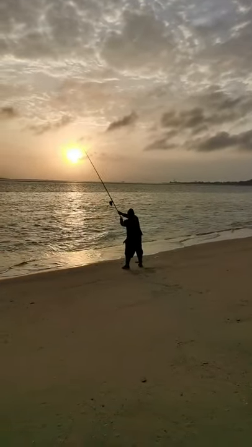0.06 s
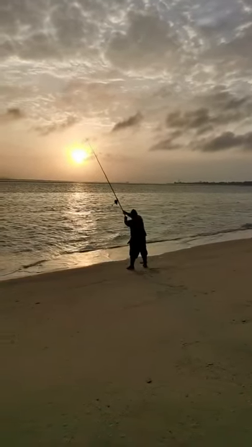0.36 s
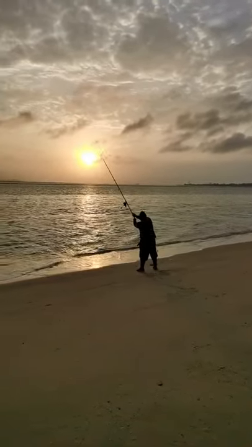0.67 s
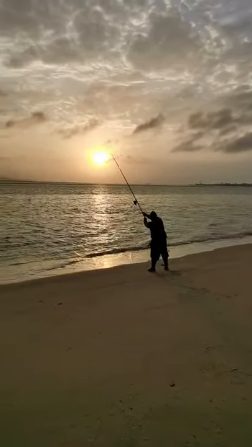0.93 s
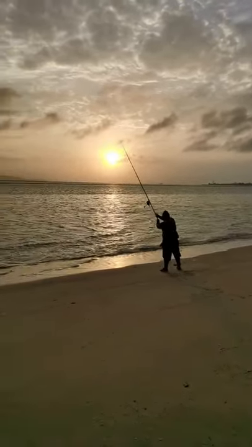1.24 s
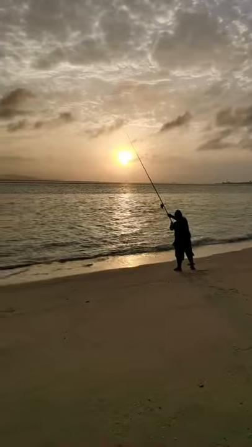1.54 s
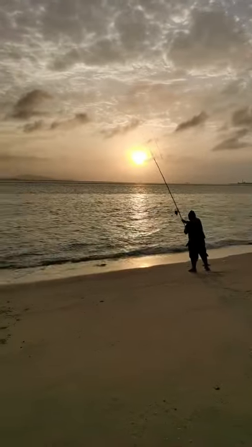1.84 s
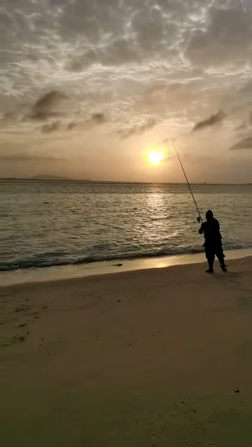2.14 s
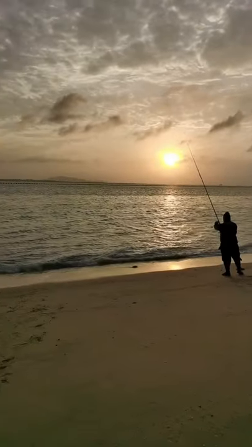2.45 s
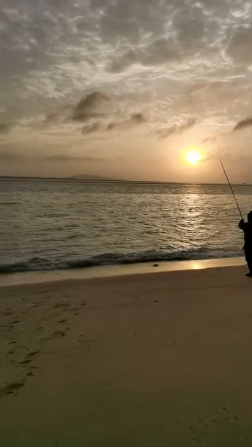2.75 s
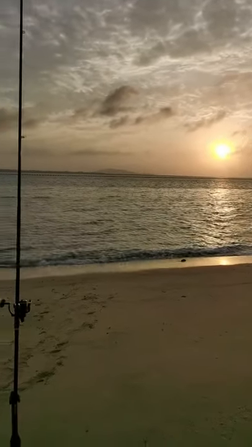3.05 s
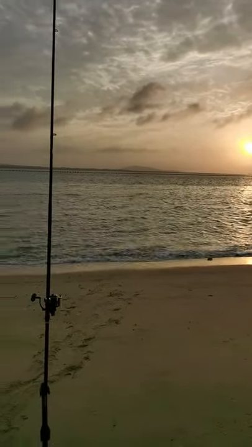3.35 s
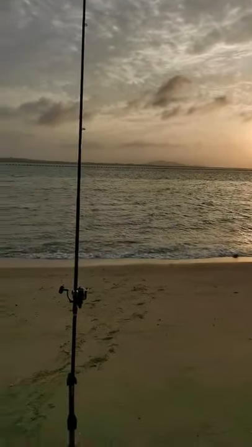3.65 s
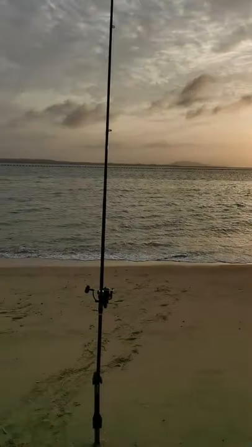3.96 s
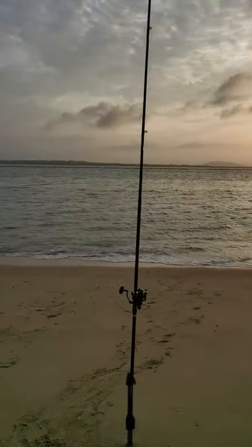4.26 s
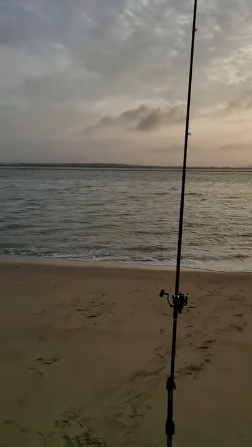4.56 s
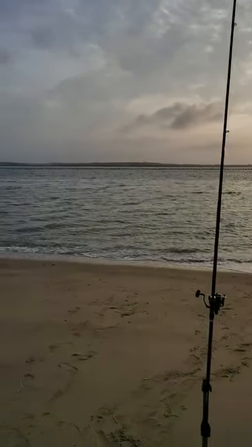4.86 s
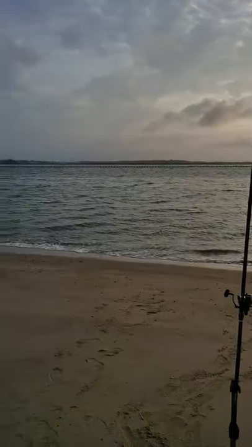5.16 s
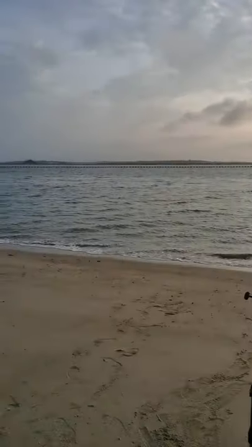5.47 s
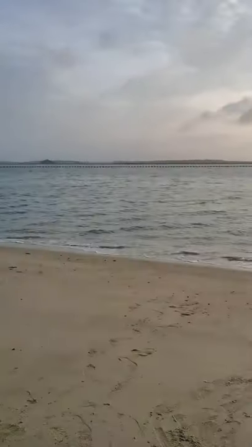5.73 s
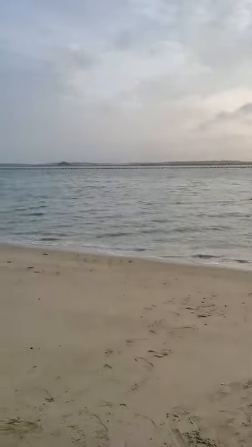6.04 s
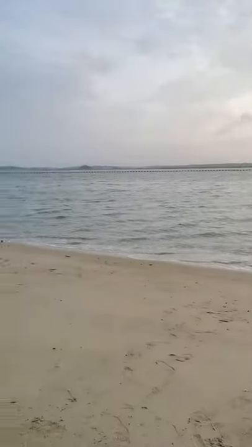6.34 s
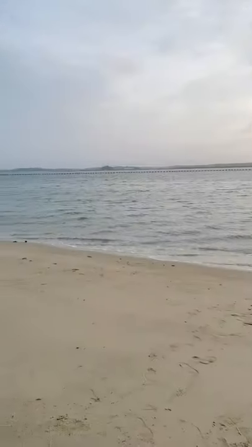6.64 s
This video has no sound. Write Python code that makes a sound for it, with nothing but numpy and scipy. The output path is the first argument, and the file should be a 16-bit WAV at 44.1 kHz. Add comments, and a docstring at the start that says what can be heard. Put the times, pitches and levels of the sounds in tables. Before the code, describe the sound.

Wind on an open beach buffets a small microphone with an uneven low rumble and fine crackle. Early on, two loud blasts tear across it, full of pops and thumps. The wind then eases to a softer rumble with scattered puffs and pops. Behind it, small waves lap and bubble quietly, and their foam fizzes into the sand.

```python
"""An uneven low rumble: wind on an open beach buffets a small microphone.
Two blasts tear across its port in strings of roaring surges, while single eddies thump, pop and crackle.
Behind the wind, small waves lap and bubble, and their foam fizzes into the sand.
Loud wind ducks the treble and a limiter holds the peaks."""
import sys
import numpy as np
from scipy import signal
from scipy.fft import rfft, irfft, next_fast_len
from scipy.io import wavfile
from scipy.ndimage import uniform_filter1d, minimum_filter1d, map_coordinates

SR = 44100
rng = np.random.default_rng(int(sys.argv[2]) if len(sys.argv) > 2 else 0)


def master_out(mix):
    """Clip the mix to full scale and print it as 16-bit PCM to the path in sys.argv[1]."""
    frames = np.transpose(np.atleast_2d(mix))
    ceiling = np.clip(frames, -1, 1)
    pcm = np.round(ceiling * 32767).astype(np.int16)
    wavfile.write(sys.argv[1], SR, pcm)


N = 295470


def amp(db):
    """Decibels to gain."""
    return 10 ** (np.asarray(db) / 20)


def unit(x):
    """Scale to rms 1."""
    return x / np.sqrt(np.mean(x ** 2) + 1e-20)


def clock():
    """The time of each sample, in seconds."""
    return np.arange(N) / SR


def automation(rows):
    """One breakpoint curve for each column after the time."""
    times, *columns = np.transpose(rows)
    return [np.interp(clock(), times, column) for column in columns]


def gate(start_s, end_s, fade_s):
    """Open between two times, with a linear fade centred on each."""
    return np.clip(np.minimum(clock() - start_s, end_s - clock()) / fade_s + .5, 0, 1)


def wobble(rate_hz):
    """A smooth random modulator without extreme swings."""
    knots = np.clip(rng.standard_normal(N // 20), -2, 2)
    t = clock()
    coarse = map_coordinates(knots, [t[::20] * rate_hz], mode="mirror")
    return np.interp(t, t[::20], coarse)


def impulse_response(eq, size=8192):
    """The minimum-phase response of an EQ curve of (freq_hz, gain_db) points."""
    hz, db = np.transpose(eq)
    gain_db = np.interp(np.log(np.fft.rfftfreq(size, 1 / SR) + 1), np.log(hz), db)
    cepstrum = irfft(np.log(amp(gain_db)))
    cepstrum[1:size // 2] *= 2
    cepstrum[size // 2 + 1:] = 0
    return irfft(np.exp(rfft(cepstrum))) * np.hanning(2 * size)[size:]


def colour(x, eq):
    """Run x through an EQ curve and scale it to rms 1."""
    return unit(signal.fftconvolve(x, impulse_response(eq))[:N])


def rush(eq, swell_db):
    """Coloured noise of rms 1 whose drive swells and sinks."""
    return colour(rng.standard_normal(N) * amp(swell_db), eq)


def steady(x, window_s):
    """Even out the slow swells of a noise and keep its fast grain."""
    power = np.abs(uniform_filter1d(x ** 2, int(window_s * SR)))
    return x / np.sqrt(power + 1e-4)


def patchy(x, depth_db):
    """Patches of random gain, a few hundred Hz wide, come and go in a noise."""
    spectrogram = signal.stft(x, nperseg=512)[2]
    patches = uniform_filter1d(rng.standard_normal(spectrogram.shape), size=4, axis=0)
    patches = unit(uniform_filter1d(patches, size=40, axis=1))
    return unit(signal.istft(spectrogram * amp(depth_db * patches), nperseg=512)[1][:N])


def snaps(per_s):
    """Sudden pressure jumps of random size and timing."""
    return unit(rng.standard_normal(N) * (rng.random(N) < per_s / SR))


def bursts(rows, width, fade_s, grain_db):
    """One burst of grainy band noise a row; width is a share of the centre frequency."""
    out = np.zeros(N)
    drive = rng.standard_normal(N) * amp(grain_db * wobble(300))
    for start, length, hz, db in rows:
        band = signal.butter(2, [hz / (1 + width), hz * (1 + width)], "band", fs=SR, output="sos")
        noise = steady(unit(signal.sosfilt(band, drive)), window_s=0.28)
        out += amp(db) * gate(start, start + length, fade_s) * noise
    return out


def pings(start_s, pitch_hz, level_db, rise_cycles):
    """Short sine rings that peak after rise_cycles of their pitch, then die."""
    offsets = np.arange(3000)
    cycles = pitch_hz[:, None] * offsets / SR
    age = cycles / rise_cycles
    rings = amp(level_db)[:, None] * age * np.exp(1 - age) * np.sin(2 * np.pi * cycles)
    positions = np.round(start_s * SR).astype(int)[:, None] + offsets
    return np.bincount(positions.ravel(), rings.ravel(), N)[:N]


# airy top of the spent foam: freq_hz, gain_db
FIZZ_EQ = [(7000, -30), (9500, -2), (12000, -4), (14700, -1), (15500, -22.5)]
# foam draining after the largest wave: time_s, level_db
FIZZ_LEVELS = [(3.2, -88.5), (3.7, -74), (4.3, -70), (4.9, -74), (5.6, -72.5), (6.3, -77.5)]
def fizz(grain_db=2):
    """Spent foam fizzes brightly as it sinks into the sand."""
    level_db, = automation(FIZZ_LEVELS)
    return amp(level_db) * rush(FIZZ_EQ, grain_db * wobble(500))


# midrange wash of the water: freq_hz, gain_db
WASH_EQ = [(150, -26.5), (500, 10), (850, 3), (1200, 5), (1500, 1.5), (2400, 3.5), (3000, 1), (3450, -3),
           (4300, -0.5), (4700, -10.5), (5200, -64), (9000, -44)]
# bright hiss of fresh foam: freq_hz, gain_db
FOAM_EQ = [(2000, -16.5), (4500, 0.5), (6000, 3), (8000, 1), (10500, 3.5), (12500, 2.5), (14500, -4.5),
           (15700, -12.5)]
# rise and fall of the small waves: time_s, wash_db, foam_db
SEA_LEVELS = [(0, -52.5, -63), (.6, -63, -69.5), (1, -62, -63), (1.599, -65.5, -70.5), (2, -58, -60.5),
              (2.7, -56.5, -66), (3.1, -48.5, -57), (3.7, -53, -67.5), (4.35, -53, -66.5),
              (4.8, -52.5, -71.5), (5.5, -58, -72), (6.35, -60, -75), (6.7, -57, -69.5)]
# single wavelets spilling over: start_s, length_s, centre_hz, level_db
SPILLS = [(.05, 0.51, 975, -63.5), (3.17, 0.074, 3400, -52.5), (3.85, 0.75, 2300, -63.5),
          (5.18, 0.37, 1730, -62.5), (5.3, 1.25, 515, -57.5), (5.6, 1.3, 727, -61.5),
          (5.8, 0.12, 1680, -58), (6.53, 0.15, 2100, -61), (6.52, 0.29, 3770, -67)]
def waves(wash_trim_db=-1, lap_db=1.0, splash_db=1.7):
    """Wavelets lap and spill at shifting pitches; their foam hisses on the sand."""
    wash_db, foam_db = automation(SEA_LEVELS)
    water = rush(WASH_EQ, lap_db * wobble(12) + splash_db * wobble(200))
    water = steady(patchy(water, depth_db=1.7), window_s=.3)
    spills = bursts(SPILLS, width=0.18, fade_s=0.068, grain_db=4.0)
    foam = rush(FOAM_EQ, 1.5 * wobble(660))
    return amp(wash_db + wash_trim_db) * water + spills + amp(foam_db) * foam


def bubbles(trim_db=-14, low_hz=780, high_hz=3900, spread_db=3.5, count=1100):
    """A crowd of tiny bubbles rings in the lapping water and follows its loudness."""
    when, pitch, size = rng.random((count, 3)).T
    start_s = when * N / SR
    pitch_hz = low_hz * (high_hz / low_hz) ** pitch
    times, wash_db, _ = np.transpose(SEA_LEVELS)
    accent_db = spread_db * np.minimum(-np.log(size), 2)
    level_db = np.interp(start_s, times, wash_db) + trim_db + accent_db
    return pings(start_s, pitch_hz, level_db, rise_cycles=10.7)


# bass weight of the large eddies: freq_hz, gain_db
RUMBLE_EQ = [(12, -29), (25, -13.5), (45, -3.5), (75, 0), (110, -4.5), (150, -10), (220, -14.5),
             (400, -34.5), (700, -75), (1500, -120)]
# low mids of the smaller eddies: freq_hz, gain_db
FLUTTER_EQ = [(60, -25.5), (120, 0), (170, 1), (230, -7), (300, -6.5), (400, -13), (550, -20.5), (750, -32),
              (1200, -65), (3000, -101)]
# the bed of breeze at the microphone: time_s, rumble_db, flutter_db
WIND_LEVELS = [(0, -33, -39.5), (.25, -31.5, -50), (.45, -28, -41), (.88, -32, -51.5), (.97, -36, -84),
               (1.65, -32, -38), (2, -29, -46), (2.55, -33.5, -37.5), (2.8, -35, -34), (3, -30, -29.5),
               (3.2, -38, -33.5), (3.5, -33, -36), (4, -42.5, -39), (4.17, -40.5, -51), (4.45, -43, -57),
               (4.8, -43, -45.5), (4.97, -30.5, -36.5), (5.42, -45.5, -48.5), (5.7, -35.5, -38.5),
               (5.9, -41, -42.5), (6.08, -31.5, -36), (6.7, -28.5, -38.5)]
# soft shoves as the biggest eddies pass: centre_s, gain_db
SHOVES = [(0.086, 6.5), (0.461, 4.5), (.77, 2.5), (0.859, 8), (1.194, 3.5), (1.305, 2.5), (1.81, 3),
          (2.73, 4), (3.15, -2.5), (4.3, 2.5), (4.69, 7.5), (5.049, 5), (5.173, 7), (5.985, 4.5),
          (6.37, 0.5)]
def buffeting(rumble_trim_db=1, rumble_heave_db=-21, flutter_heave_db=-21.5, shove_s=0.035):
    """Large eddies rumble and shed smaller ones that flutter higher up. Both heave with a blast."""
    rumble_db, flutter_db = automation(WIND_LEVELS)
    shove_db = sum(db * np.exp(-((clock() - centre) / shove_s) ** 2) for centre, db in SHOVES)
    heave = blast_gate()
    eddies, swell = wobble(35), wobble(22)
    rumble = steady(rush(RUMBLE_EQ, 3.5 * eddies), window_s=0.091)
    flutter = steady(rush(FLUTTER_EQ, 4.5 * eddies + 2 * wobble(150)), window_s=0.053)
    # the rumble sinks as the flutter swells
    rumble_gain = np.hypot(amp(rumble_db + rumble_trim_db - 1.46 * swell), amp(rumble_heave_db) * heave)
    flutter_gain = np.hypot(amp(flutter_db + 2.4 * swell), amp(flutter_heave_db) * heave)
    return amp(shove_db) * (rumble_gain * rumble + flutter_gain * flutter)


# thin edge of the crackle and ticks, peaking near 4 kHz: freq_hz, gain_db
CRACKLE_EQ = [(2500, -53), (3600, -6), (4050, 11.5), (4400, 12), (5200, -1), (7000, -10), (9000, -14),
              (12500, -15.5), (15000, -41)]
def crackle(hold_db=-61, hold_until_s=2.7, fade_db_per_s=14, flicker_db=3, hiss_db=-5.0, snap_db=-5.5):
    """Wind crackles finely in the port, drops out under the blasts and then dies away."""
    level_db = hold_db - fade_db_per_s * np.maximum(clock() - hold_until_s, 0)
    hiss = amp(hiss_db) * rush(CRACKLE_EQ, 4 * wobble(260))
    snapping = amp(snap_db) * colour(snaps(per_s=110), CRACKLE_EQ)
    return amp(level_db + flicker_db * wobble(12)) * (1 - blast_gate()) * (hiss + snapping)


# thin treble sputters: start_s, length_s, centre_hz, level_db
SPUTTERS = [(.145, .025, 2850, -61), (.255, .04, 3400, -59), (.375, .025, 3550, -59),
            (1.975, .04, 3900, -60), (2.506, .06, 2720, -52.5), (2.565, .055, 2850, -56),
            (2.62, .05, 3000, -62), (5.476, .024, 10000, -66.5)]
def sputters(trim_db=1):
    """Thin sputters, each in a narrow band of treble; a few trail the second blast."""
    return amp(trim_db) * bursts(SPUTTERS, width=0.09, fade_s=0.0017, grain_db=6.5)


# ticks that stand out of the crackle: start_s, level_db
TICKS = [(0.237, -40), (.284, -45), (0.304, -39), (0.405, -39.5), (0.446, -44), (.464, -42), (0.4773, -37),
         (0.573, -43), (.602, -44), (.69, -46), (.759, -42.5), (.783, -45), (.797, -48), (.888, -47),
         (.925, -48), (.981, -46), (1.012, -39), (1.03, -36), (1.509, -32), (1.543, -47), (1.567, -41.5),
         (1.592, -49), (1.64, -48), (1.682, -47), (1.706, -39), (1.732, -38), (1.761, -45.5),
         (1.817, -42.5), (1.827, -45), (1.845, -40.5), (1.857, -46), (1.904, -49), (1.916, -46),
         (1.955, -45), (2.808, -36), (3.146, -34)]
def ticks(trim_db=-5, rise_s=.0018, grain_db=3):
    """Each thin tick is a pinch of fine crackle that swells and dies within milliseconds."""
    envelope = np.zeros(N)
    age = np.arange(SR // 20) / SR / rise_s
    for start, db in TICKS:
        envelope[round(start * SR):][:len(age)] += amp(db) * age * np.exp(1 - age)
    return amp(trim_db) * envelope * steady(rush(CRACKLE_EQ, grain_db * wobble(700)), window_s=0.013)


# breathy body of a puff: freq_hz, gain_db
PUFF_EQ = [(100, -9), (300, 4.5), (700, 5), (1200, -5.5), (1800, -11), (3000, -94), (6000, -49)]
# brief puffs of air: start_s, length_s, level_db, cutoff_hz
PUFFS = [(0.056, 0.11, -41.5, 362), (0.421, 0.093, -47, 380), (0.602, 0.051, -47, 400),
         (.82, 0.055, -45, 390), (1.62, 0.036, -41.5, 450), (2.899, 0.15, -41, 1470),
         (3.547, 0.073, -47, 1110), (3.654, 0.031, -37, 1900), (3.82, 0.024, -43.5, 900),
         (4.002, 0.015, -41, 750), (4.88, 0.024, -37.5, 700), (5.961, 0.028, -39, 654)]
def puffs(ragged_db=4):
    """Puffs graze the port and sputter for a moment; softer air sounds duller."""
    out = np.zeros(N)
    air = rush(PUFF_EQ, ragged_db * wobble(220))
    for start, length, db, cutoff_hz in PUFFS:
        lowpass = signal.butter(5, cutoff_hz, fs=SR, output="sos")
        dull_air = steady(unit(signal.sosfilt(lowpass, air)), window_s=.05)
        out += amp(db) * gate(start, start + length, fade_s=0.017) * dull_air
    return out


# hollow pops in one quick run: start_s, pitch_hz, level_db
CHIRR_POPS = [(3.7129, 970, -26), (3.72, 955, -26.5), (3.7274, 854, -26.5), (3.731, 690, -23.5)]
def chirr():
    """A quick rattle of hollow pops that fall in pitch."""
    return pings(*np.transpose(CHIRR_POPS), rise_cycles=0.64)


# tone of one pressure pulse: freq_hz, gain_db
POP_EQ = [(60, 24.5), (250, -1.5), (800, 13), (1500, 5), (2500, -2), (4200, -15.5), (6000, -29.5),
          (10000, -33.5), (15000, -59.5)]
# sharp eddies hitting the port: start_s, level_db, cutoff_hz
POPS = [(1.057, -14, 13000), (1.067, -7.5, 4000), (1.077, -6, 13000), (1.095, -23, 6000),
        (1.101, -11.5, 3180), (1.1265, -13.5, 2700), (1.201, -11.5, 2070), (1.23, -21.5, 2000),
        (1.247, -26.5, 2960), (1.297, -19, 3000), (1.318, -9.5, 4000), (1.347, -15.5, 2190),
        (1.365, -11.5, 2400), (1.375, -12, 4000), (1.402, -12.5, 5000), (1.416, -7.5, 4470),
        (1.453, -8, 6000), (1.488, -19, 5000), (2.041, -7, 8000), (2.09, -14, 4500), (2.1, -14, 4500),
        (2.131, -17, 3500), (2.159, -19, 3500), (2.177, -16, 2400), (2.22, -17, 3500), (2.234, -19, 4500),
        (2.247, -10, 4000), (2.276, -13.5, 5000), (2.293, -20, 2980), (2.302, -14, 6000),
        (2.347, -12, 6000), (2.391, -10, 3500), (2.412, -10.5, 6000), (2.887, -32, 880), (2.917, -38, 1400),
        (2.953, -35, 1300), (3.035, -14, 2520), (3.651, -25, 1700), (3.68, -23, 1700), (3.69, -30, 1400),
        (4.869, -29, 1000), (4.883, -24.5, 1600), (4.892, -25, 1600), (4.913, -25.5, 1300),
        (4.979, -24.5, 7000), (5.012, -31, 1600), (5.029, -34, 750), (5.974, -48, 800)]
def pops():
    """Each sharp eddy is one pressure pulse, a push or a pull; grazing ones are duller."""
    out = np.zeros(N + SR)
    pulse = impulse_response(POP_EQ)
    for start, db, cutoff_hz in POPS:
        pop = signal.sosfilt(signal.butter(4, cutoff_hz, fs=SR, output="sos"), pulse)
        polarity = rng.choice([-1, 1])
        out[round(start * SR):][:len(pop)] += amp(db) * polarity * pop / np.abs(pop).max()
    return out[:N]


# the heaviest single hits: centre_s, pitch_hz, level_db
THUMPS = [(1.1118, 423, -8), (1.115, 477, -7.5), (1.1251, 300, -7.5), (1.137, 130, -8.5), (1.159, 169, -10),
          (1.185, 260, -18), (1.195, 151, -5), (1.21, 330, -16), (1.23, 236, -10), (1.295, 170, -7),
          (1.333, 250, -11), (1.364, 160, -9), (1.408, 190, -9), (2.111, 230, -14.5), (2.142, 129.5, -12),
          (2.175, 142, -12.5), (2.223, 148.7, -8), (2.241, 161, -11), (2.273, 194, -10.5),
          (2.341, 210, -13), (2.377, 220, -10), (2.39, 199, -14), (2.888, 260, -18.5), (2.954, 260, -18.5),
          (3.036, 282, -15.5), (3.753, 160, -21.5), (4.888, 300, -23), (4.913, 320, -24), (4.941, 150, -20),
          (4.977, 173, -20.5), (5.041, 187, -21)]
def thumps():
    """A heavy eddy shoves the diaphragm once, with a suck before and after."""
    out = np.zeros(N)
    for centre, hz, db in THUMPS:
        phase_squared = (np.pi * hz * (clock() - centre)) ** 2
        out += amp(db) * (1 - 2 * phase_squared) * np.exp(-np.minimum(phase_squared, 50))
    return out


# thin flicks that end each blast: start_s, length_s, centre_hz, level_db
BLAST_TAILS = [(1.463, 0.019, 700, -36), (1.467, 0.0113, 1490, -44), (1.486, 0.005, 1160, -24),
               (1.491, 0.022, 1300, -52), (2.424, 0.02, 764, -29.5), (2.428, 0.0206, 1540, -34),
               (2.451, 0.0055, 1800, -24.5), (2.456, 0.041, 1600, -43), (2.498, 0.0084, 2620, -37)]
def blast_tails():
    """Thin flicks of band noise, rising in pitch, end each blast."""
    return bursts(BLAST_TAILS, width=0.24, fade_s=0.0014, grain_db=4.0)


# roaring body of a blast: freq_hz, gain_db
ROAR_EQ = [(80, -15), (160, 0.5), (290, 2), (420, 4.5), (550, 1.5), (800, -3.5), (1200, -13.5), (1800, -23),
           (3000, -57), (6000, -56), (11000, -89)]
# its tearing edge: freq_hz, gain_db
RASP_EQ = [(400, -2.5), (900, 3.5), (1400, 3), (2000, -2), (2800, -10.5), (3600, -19.5), (4400, -21.5),
           (5500, -27.5), (8000, -54), (15000, -82.5)]
# surges of the two blasts, straight into the port: start_s, end_s, roar_db, rasp_db
SURGES = [(1.051, 1.067, -25.5, -29.5), (1.075, 1.079, -13, -21), (1.092, 1.102, -12, -34),
          (1.108, 1.121, -19, -44), (1.136, 1.142, -22, -41), (1.153, 1.157, -34, -48),
          (1.177, 1.186, -33, -56), (1.189, 1.212, -17.5, -51), (1.221, 1.228, -19, -50),
          (1.24, 1.273, -19.5, -45), (1.278, 1.301, -23, -47), (1.307, 1.321, -15, -32),
          (1.325, 1.36, -28, -42), (1.364, 1.39, -21, -29), (1.391, 1.423, -21.5, -26),
          (1.427, 1.438, -22.5, -28.5), (1.444, 1.467, -22, -27.5), (2.037, 2.052, -25.5, -21.5),
          (2.062, 2.072, -25, -46), (2.083, 2.107, -16, -27.5), (2.12, 2.148, -18.5, -32),
          (2.155, 2.161, -19, -39), (2.17, 2.193, -21.5, -31.5), (2.201, 2.213, -26, -43),
          (2.216, 2.247, -16, -29), (2.254, 2.27, -27, -48), (2.27, 2.302, -20, -30),
          (2.31, 2.332, -18.5, -34), (2.34, 2.356, -20.5, -29), (2.364, 2.385, -22.5, -40),
          (2.397, 2.421, -20.5, -31.5)]
def blasts(roar_trim_db=-1.5, rasp_trim_db=-2, hiss_db=-9, attack_s=0.0026, release_s=0.0033):
    """Eddies peel off the port one by one; each surge roars and breaks into a rasp of tiny snaps."""
    envelopes = np.zeros((2, N))
    t = clock()
    for start, end, roar_db, rasp_db in SURGES:
        active = (t >= start) & (t < end + 10 * release_s)
        release = np.exp(-np.maximum(t[active] - end, 0) / release_s)
        envelopes[0, active] += release * amp(roar_db + roar_trim_db)
        envelopes[1, active] += release * amp(rasp_db + rasp_trim_db)
    attack = np.hanning(int(attack_s * SR) + 2)
    roar_gain, rasp_gain = signal.fftconvolve(envelopes, [attack / attack.sum()], axes=1)[:, :N]
    grain = wobble(400)  # roughens roar and rasp together
    drive = snaps(per_s=800) + amp(hiss_db) * rng.standard_normal(N)
    rasp = steady(colour(drive * amp(2 * grain), RASP_EQ), window_s=0.022)
    roar = steady(rush(ROAR_EQ, 3 * grain), window_s=0.018)
    flicker_db = wobble(110)
    return amp(flicker_db) * (roar_gain * roar + rasp_gain * rasp)


def blast_gate(lag_s=0.015, fade_s=0.031):
    """Opens toward 1 while a blast lies on the port and closes to 0 after it."""
    return np.max([gate(start + lag_s / 2, end + lag_s, fade_s) for start, end, *_ in SURGES], axis=0)


def scene():
    """Wind at the port up front, the sea behind it, in mono."""
    wind = buffeting() + blasts()
    accents = blast_tails() + thumps() + puffs() + pops() + ticks() + crackle() + sputters() + chirr()
    sea = waves() + fizz() + bubbles()
    return (wind + accents + sea)[None]


def duck_treble(x, split_hz=4050, threshold_db=-22, memory_s=0.081, floor_db=-26):
    """A suppressor turns the treble down while the last moments were loud."""
    size = int(memory_s * SR)
    power = signal.fftconvolve(x[0] ** 2, np.ones(size) / size)[:N]
    low = signal.sosfiltfilt(signal.butter(6, split_hz, fs=SR, output="sos"), x)
    treble_gain = 1 / np.hypot(1, power / amp(threshold_db) ** 2)
    return low + (x - low) * np.maximum(treble_gain, amp(floor_db))


def limiter(x, ceiling=.49, window_samples=441):
    """The gain dips smoothly around each peak to hold it under the ceiling."""
    needed = np.minimum(1, ceiling / (np.abs(x) + 1e-9))
    return x * uniform_filter1d(minimum_filter1d(needed, window_samples), window_samples)


def band_limit(x, top_hz=15700):
    """A brick-wall low-pass."""
    size = next_fast_len(N + SR // 2)
    passband = np.fft.rfftfreq(size, 1 / SR) < top_hz
    return irfft(rfft(x, size) * passband, size)[..., :N]


def record(dry):
    """Loud wind ducks the treble, a fast limiter holds the peaks and the very top is cut."""
    return band_limit(limiter(duck_treble(dry)))


dry = scene()
out = record(dry)
master_out(out)
```